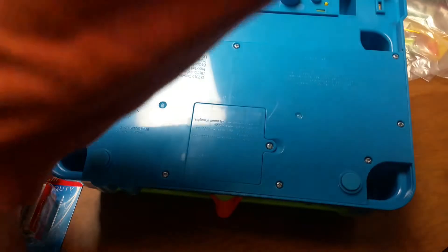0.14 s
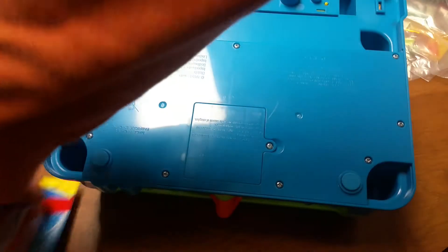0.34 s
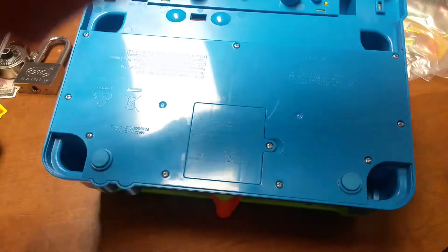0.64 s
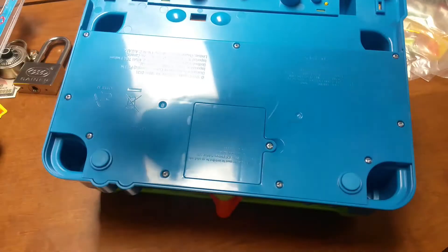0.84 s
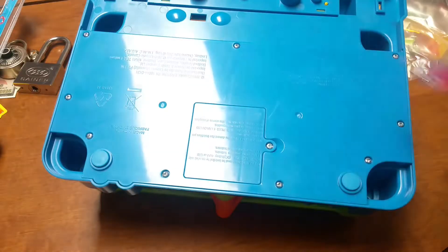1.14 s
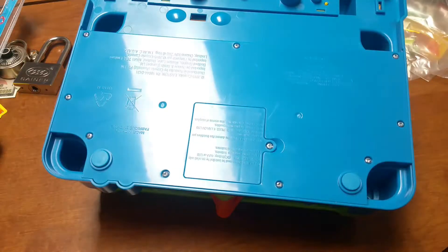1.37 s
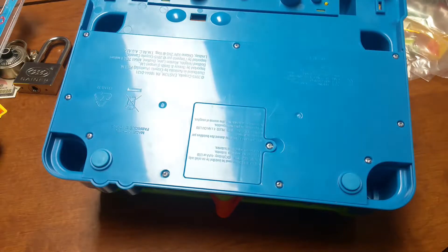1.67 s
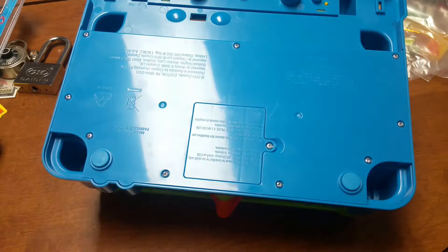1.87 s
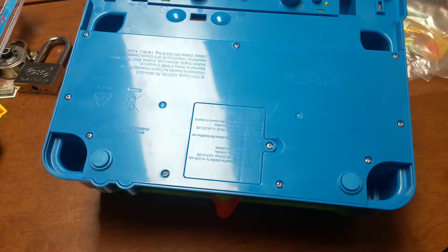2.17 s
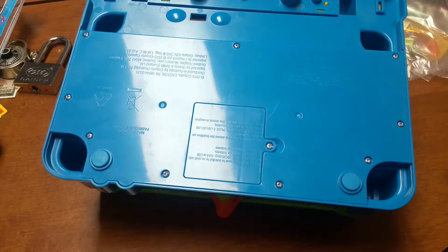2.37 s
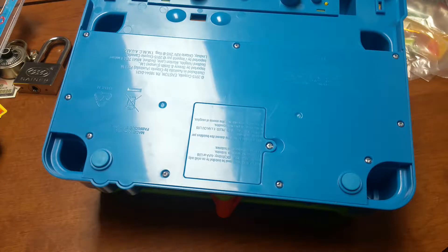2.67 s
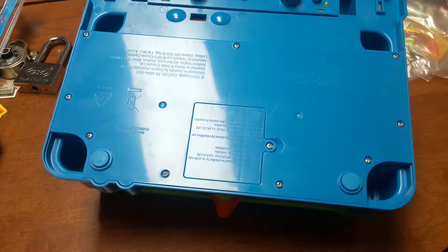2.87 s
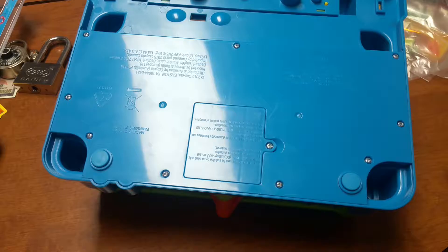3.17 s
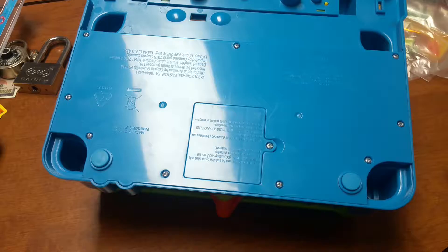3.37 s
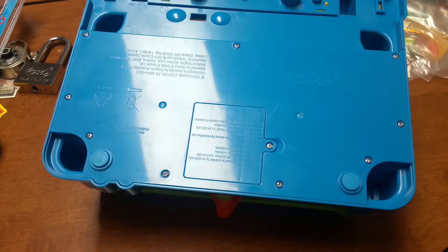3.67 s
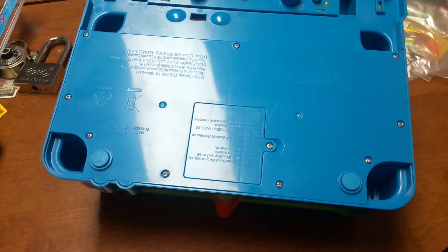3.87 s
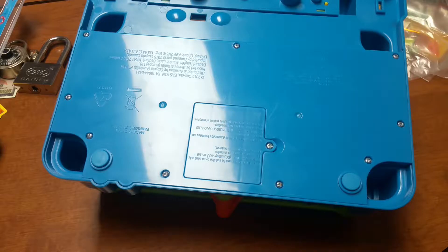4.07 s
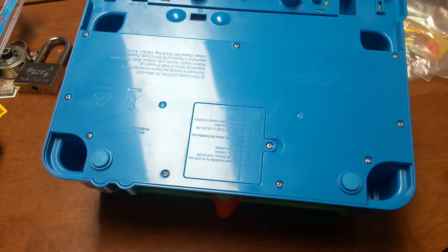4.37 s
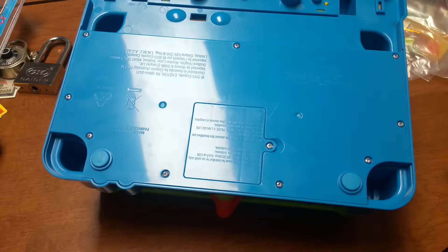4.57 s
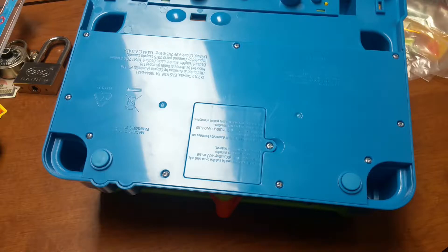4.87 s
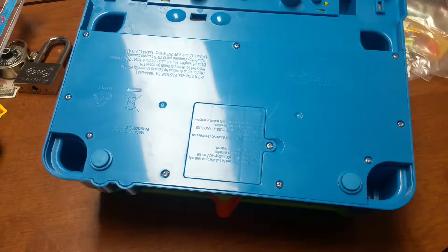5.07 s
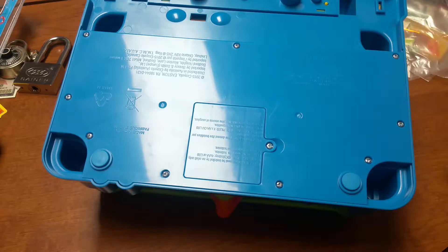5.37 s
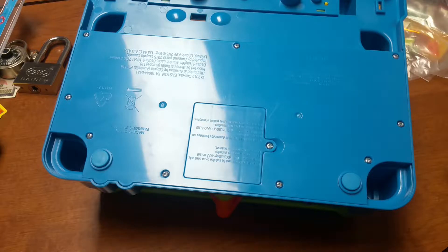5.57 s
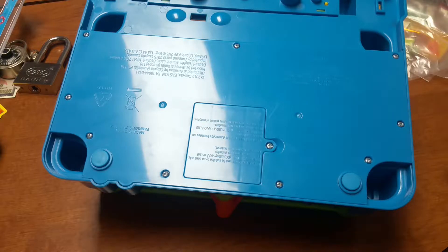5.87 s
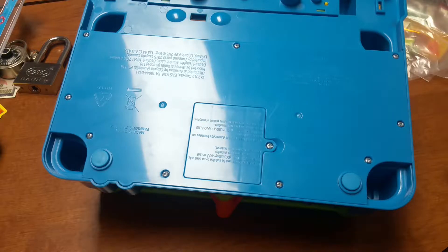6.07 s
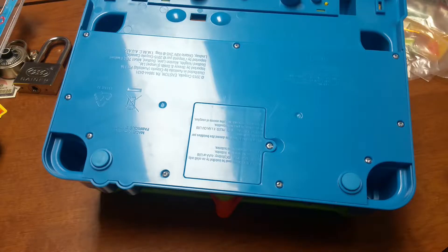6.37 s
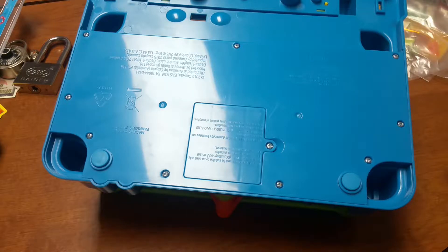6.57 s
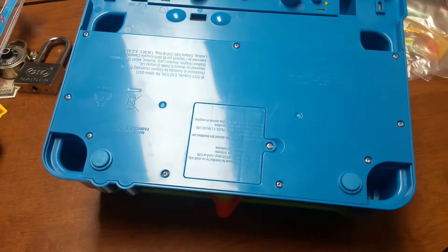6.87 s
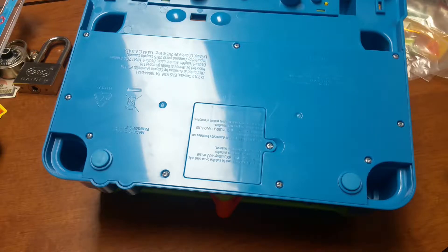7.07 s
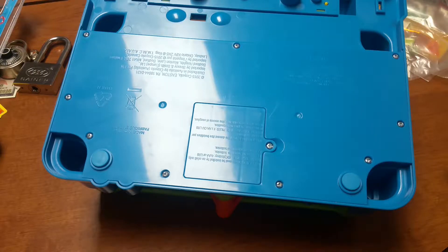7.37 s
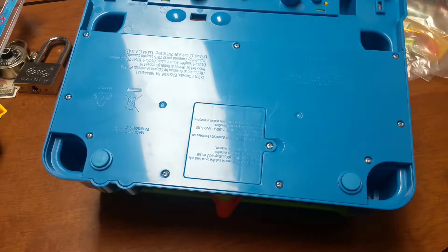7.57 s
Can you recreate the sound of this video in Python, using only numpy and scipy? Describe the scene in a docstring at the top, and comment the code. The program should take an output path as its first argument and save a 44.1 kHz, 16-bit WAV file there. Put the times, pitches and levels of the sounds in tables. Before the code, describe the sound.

In a small quiet room with a faint electrical hum, fingers slide over a stiff plastic blister pack, card rubbing dully and plastic rustling. The pack buckles with one snap, then with uneven bunches of sharp snaps and brief scrapes. Later the plastic also creaks and its edges click in rapid little runs. The sounds are close to the microphone, mostly a little to the right.

```python
"""Hands work at a plastic blister pack of batteries beside a toy, close to two microphone ports.
First, over the air and faint mains hum of a small room, sliding friction makes card and plastic rub
and rustle. At 1 s a facet buckles and its modes ring as a snap; from about 2 s snaps come in clusters,
among gritty fingertip scrapes. From 5.8 s stick-slip creaks and runs of thin edge ticks join them,
until the last tick at 7.7 s. Throughout, the room answers with a short reverberation."""
import sys
import numpy as np
from scipy import signal
from scipy.fft import rfft, irfft
from scipy.io import wavfile
from scipy.ndimage import uniform_filter1d, map_coordinates

SR = 44100
rng = np.random.default_rng(int(sys.argv[2]) if len(sys.argv) > 2 else 0)


def wav_out(sig):
    """Save sig, one row per channel (or a flat mono array), as 16-bit PCM at SR to the path in sys.argv[1]."""
    wavfile.write(sys.argv[1], SR, np.round(np.clip(np.atleast_2d(sig).T, -1, 1) * 32767).astype(np.int16))


N = 341276
TIME, FREQS = np.arange(N) / SR, np.fft.rfftfreq(N, 1 / SR)
IMPACT_SIZE = 2048  # samples in one snap, tick or slip
IMPACT_FREQS = np.fft.rfftfreq(IMPACT_SIZE, 1 / SR)

# Levels are relative within each table unless marked rms.
# spectral density of the room's air: f/Hz, level/dB
AIR_SPECTRUM = [(20, -28), (55, 3), (85, -6.5), (130, 0.5), (220, 6), (320, 2), (450, -4.5), (700, -8.5),
                (1400, -15), (3200, -15.5), (6000, -22), (10000, -25), (15500, -29.5)]
# partials of the hum: f/Hz, rms level/dB
HUM_PARTIALS = [(119, -64), (199.5, -62.5), (297, -64)]
# reverberation time: f/Hz, T60/s
REVERB_TIMES = [(150, 0.78), (700, 0.4452), (2500, 0.4249), (6000, 0.33), (14000, 0.52)]
# colour of the reverberation: f/Hz, level/dB
REVERB_SPECTRUM = [(150, -6), (700, 1.5), (2500, -1.5), (6000, -0.5), (14000, -2.5)]
# position of the hands: t/s, offset (0 straight ahead, 1 to the side)
HAND_PATH = [(.3, 1), (.9, 0), (1.45, 0), (1.8, 1)]
# modes of the hollow body under the fingers: f/Hz, level re the plain rub/dB
BODY_MODES = [(226, 2.5), (282, 3.5), (325, 1), (433, 5.5), (504, 8), (554, -2), (690, 1.5), (809, -2.5)]
# resonances driven by a stroke: centre t/s, duration/s, f/Hz, nominal bandwidth/Hz, level/dB
GROAN_BANDS = [(0.29, 0.3, 343, 45, -61.5), (1.694, 0.0071, 440, 110, -50), (3.522, 0.048, 255, 115, -41),
               (3.81, 0.13, 615, 190, -42.5), (4.246, 0.052, 695, 80, -43.5), (4.343, 0.024, 350, 270, -40),
               (5.238, 0.028, 200, 62, -44.5), (5.543, 0.054, 2380, 54, -40.5),
               (5.586, 0.069, 550, 360, -39.5), (5.946, 0.11, 158.5, 8.5, -45),
               (6.415, 0.38, 265, 154, -53), (6.796, 0.097, 122, 19, -46.5), (6.78, 0.15, 296, 260, -46.5)]
# light contact of the holding hand: t/s, rustle level/dB
HOLD_LEVELS = [(0.16, -55), (0.32, -83), (1.1, -59.5), (1.8, -60.5), (2.8, -70), (3.4, -55.5), (4.4, -53),
               (5.0, -56.5), (5.4, -60), (6.3, -58.5), (7.0, -66), (7.7, -58.5)]
# finger strokes: peak t/s, rise/s, fall/s, rustle level/dB, rub re rustle/dB, fizz re rustle/dB
FINGER_STROKES = [(0.0, .05, 0.11, -40.5, 0.5, -15.5), (0.85, 0.31, 0.22, -68, -16, 1),
                  (1.02, 0.11, 0.071, -56, 6.5, -4), (1.305, 0.077, 0.17, -51, -2, -11),
                  (1.374, 0.029, 0.03, -48.5, -9, 0.5), (2.04, .03, 0.18, -47, -21, -17),
                  (2.38, 0.092, 0.22, -51.5, 1, -5), (2.58, 0.13, 0.19, -48, -18.5, 2),
                  (2.631, 0.03, 0.017, -35, -15, -11), (2.96, 0.26, 0.042, -45, -27, -10),
                  (3.07, 0.49, 0.041, -46.5, 1, -14), (3.26, 0.072, 0.1, -41.5, 5.5, -39),
                  (3.5, 0.022, 0.15, -40.5, 2.5, -20), (3.55, 0.026, 0.034, -38.5, -9, 0),
                  (3.812, 0.33, 0.066, -32.5, -2, -10.5), (4.05, 0.03, 0.15, -48, -1, -5.5),
                  (4.135, 0.072, 0.068, -42, 8.5, -15), (4.221, 0.051, 0.092, -34.5, -2, -14),
                  (4.34, 0.13, 0.24, -44.5, 6, -14), (4.521, 0.011, 0.025, -39, -2.5, 3),
                  (4.70, 0.14, 0.048, -38, 1.5, -37), (4.81, .03, 0.18, -47, -19, -6),
                  (5.03, 0.24, 0.12, -49, 9, -29), (5.096, 0.025, 0.081, -36, -0.5, -3.5),
                  (5.208, 0.062, 0.063, -32.5, -5, -12), (5.538, 0.069, 0.056, -33, -0.5, -3),
                  (5.588, 0.1, 0.13, -36, 5.5, -31), (5.81, 0.067, 0.1, -41, -4.5, -4.5),
                  (5.94, 0.2, 0.11, -44, 0, -27), (6.15, 0.083, 0.016, -45.5, -9, -7.5),
                  (6.385, 0.04, 0.027, -38.5, -16, -6), (6.62, 0.32, 0.56, -46, -0.5, -6),
                  (6.909, 0.033, 0.019, -34.5, -29, -6), (7.109, 0.047, 0.091, -36.5, -13, -7),
                  (7.33, 0.26, 0.94, -44, -12, -8.5), (7.518, 0.025, 0.059, -31, -12, -7),
                  (7.55, 0.038, 0.57, -47.5, -1, -19)]
# spectral densities of rubbed card, rustling plastic and the fizz of dry skin: f/Hz, level/dB
CARD_SPECTRUM = [(40, -37), (120, -8), (210, 2.5), (330, -1.5), (550, -2.5), (820, 2.5), (1100, 0.5),
                 (1600, -7.5), (4000, -30.5), (8000, -26), (16000, -30.5)]
PLASTIC_SPECTRUM = [(400, -26), (900, 1), (1250, 6.5), (2400, 5), (3400, 2.5), (4400, -0.5), (5800, -6.5),
                    (7000, -4.5), (9000, -56), (16000, -76)]
SKIN_SPECTRUM = [(3000, -8.5), (6000, 4), (7200, 0), (8600, -1), (10500, 1), (13000, -8), (15200, -10),
                 (16500, -31)]
# fingertip scrapes: start t/s, release t/s, level/dB, tilt/(dB per octave)
FINGER_SCRAPES = [(1.816, 1.902, -55, 0.5), (1.903, 1.963, -49, 6), (2.542, 2.62, -45, 1),
                  (2.614, 2.656, -43.5, 4), (3.634, 3.703, -45, 0), (3.736, 3.84, -44, -0.5),
                  (4.208, 4.245, -43, 1.5), (5.496, 5.565, -54, -4), (6.94, 6.958, -49, 17),
                  (7.104, 7.126, -43.5, 8)]
# spectral density of a scrape: f/Hz, level/dB
GRIT_SPECTRUM = [(1000, -14), (2400, 4.5), (5800, 0), (8000, -4), (15200, -5.5), (16300, -26)]
# creaks of the plastic: start t/s, end t/s, first slip rate/Hz, last slip rate/Hz, level/dB, f/Hz, Q
CREAK_RUNS = [(5.775, 5.873, 135, 89, -22, 8250, 1), (5.885, 5.952, 170, 240, -17, 4540, 2),
              (6.142, 6.183, 230, 130, -20, 9050, 0.58), (6.392, 6.531, 114, 190, -28, 11500, 1.7),
              (7.229, 7.276, 230, 320, -3.5, 3330, 4.5), (7.296, 7.377, 230, 280, -20.5, 6000, 1)]
# releases of a plastic edge, and around 5.9 s the louder slips of a creak, all with the same modes: t/s,
# level/dB, tilt/(dB per octave)
EDGE_TICKS = [(1.963, -16.5, 12), (3.384, -15, -3.5), (2.96, -11, -3), (4.083, -13, -8), (5.765, -6.5, -1),
              (5.877, -7.5, -5.5), (5.9055, -9, -5), (5.915, -12, -2), (5.925, -11, 3), (5.933, -6.5, -2),
              (6.101, 3, 3.5), (6.1152, -1, 8), (6.126, -4, 7), (6.136, -4, 7), (6.8453, -5, 5),
              (6.8844, 1.5, -0.5), (6.903, 0.5, 3.5), (6.9451, -1.5, 5.5), (7.0341, 1.5, 6.5),
              (7.072, -11, -0.5), (7.152, -11.5, -1), (7.165, -9.5, 6), (7.177, -14, -6.5),
              (7.202, -9.5, 3), (7.215, -13, -3), (7.2373, -10, 8), (7.2414, -17.5, -10), (7.273, -6.5, 10),
              (7.301, -10, 0), (7.324, -10, -4), (7.342, -13, 4), (7.347, -6.5, 1), (7.352, -9, 1),
              (7.3645, -6, 2), (7.37, 4.5, 4), (7.642, 0, 0), (7.585, -9, -7), (7.6936, -16, -10.5)]
# modes shared by these ticks: f/Hz, level/dB, Q
TICK_MODES = [(2950, 0, 1.2), (6530, 0, 3.1), (10400, -6.5, 4.2), (14300, -9.5, 5.3)]
# facets that spring free and ring on: t/s, f/Hz, T60/s, level/dB
FREED_FACETS = [(2.902, 1857, 0.14, -38), (5.4917, 1900, 0.13, -29.5), (6.578, 1845, 0.18, -31.5)]
# modes of the cracking crease, common to all snaps: f/Hz, level/dB, Q
CREASE_MODES = [(4760, -6.5, 4.5), (6280, 2, 5.8), (13100, -16, 3.2), (13400, -21, 23)]
# buckling facets: t/s, facet f/Hz, overtone f/Hz, sheet flex f/Hz, facet Q, overtone Q, level/dB,
# then re that level: flex/dB, overtone/dB, crack/dB
FACET_SNAPS = [(0.974, 1310, 3290, 440, 3.4, 15, 13, -14, -1.5, -18.5),
               (1.976, 1430, 3070, 514, 10.4, 8.5, 17.5, -10, -6, -25.5),
               (2.0345, 1400, 2180, 726, 12, 7.8, 15.5, -13, 2.5, -15.5),
               (2.0495, 1230, 2000, 674, 14, 2.6, 15, -5.5, -5, -32),
               (2.0958, 870.0, 3490, 530.0, 17, 27, 23, -16, -7, -17),
               (2.2259, 1730, 3670, 585, 4.4, 21, 12, -1.5, 2, -16),
               (2.3653, 1410, 3620, 410.0, 18, 12, 8, -12, -0.5, -5.5),
               (2.3888, 1600, 2690, 516, 3.6, 6.5, 14.5, -6, 3, -11.5),
               (2.9023, 1845, 3150, 1270, 13, 8.1, 18.5, -7.5, -8, -15.5),
               (3.6853, 2060.0, 5400, 480.0, 1.5, 6.8, 2, -14, 1.5, -5),
               (3.7716, 1680.0, 5740, 340.0, 1.2, 7.1, 6.5, 8.5, 2, -6),
               (3.8411, 2170, 5300, 530, 2.5, 3.7, 6, 9.5, -1.5, -16),
               (3.9659, 1590, 2800, 590.0, 1.1, 11, 12.5, 1, 0.5, -35),
               (4.0413, 1820, 2430, 660.0, 6.6, 5.7, 5.5, -5, 1.5, -33),
               (4.2167, 850, 3630, 300.0, 1.9, 6.9, 16, -21, -6.5, -25),
               (4.4894, 780, 2060, 480.0, 1.8, 21, 11, -26.0, -9.0, -15),
               (4.5078, 2180, 6500.0, 400.0, 2.6, 2.9, 11, -12, -17, -4.5),
               (4.5144, 1130, 4230.0, 400.0, 13, 3.2, 24.5, -14, -20.5, -28),
               (4.5335, 875, 2470.0, 540.0, 2.8, 7, 13, -18, -17, -35),
               (4.669, 2170, 3640, 820, 2.9, 2.1, 12.5, 5.5, -2.5, -7.5),
               (4.788, 1590, 3460, 870.0, 8.6, 6, 12.5, -6, -4.5, -33),
               (4.7933, 820, 2030, 362, 3.9, 3.9, 13, -6, -2, -13.5),
               (4.8125, 3130, 6060.0, 730.0, 2.9, 16, 10.5, -21, 0, -9),
               (4.8945, 790, 4980.0, 590.0, 11, 7.5, 20.5, -31.0, -24, -29),
               (5.071, 1075, 2880, 716, 8.7, 3.8, 20.5, -3.5, -16.5, -42.5),
               (5.102, 1830, 3450, 770, 3.6, 3.7, 0.5, 10, 13, -14),
               (5.1778, 2630, 5400.0, 850.0, 6.5, 10.1, 9.5, -18, -5, -6),
               (5.182, 780, 4840.0, 410.0, 3.1, 2.5, 23, -4.5, -16.5, -25.0),
               (5.1935, 2570, 5010.0, 960.0, 2.4, 2.7, 11, -2, 0.5, -4),
               (5.1997, 1090.0, 3620, 450.0, 1.8, 18.0, 8.5, -13, 2, 1.5),
               (5.4917, 2140, 4720, 760, 3.9, 10, 17, -15, -1, -9.5),
               (5.527, 690, 3600.0, 403, 3.9, 5.3, 15, -16, -28, -27),
               (5.759, 2050, 3700, 390.0, 2.4, 1.3, 13, -7, -11, -36),
               (5.939, 2670, 5340, 680, 4.6, 6.3, 6, 4, -4.5, -16),
               (5.963, 1870, 3320, 590.0, 7.2, 4.6, 6.5, -6, -4, -28),
               (5.974, 1200, 3060, 905, 7.1, 15, 7.5, 8, -6, -30),
               (5.995, 1770, 2710, 860.0, 8.1, 10, 7.5, -20, 6, -32),
               (6.3365, 1400, 3680, 262, 1.9, 1, 8.5, 4.5, -7, 4),
               (6.5754, 1810, 5280, 750, 4.1, 4.5, 13.5, 2, -2, -4),
               (6.5789, 1870, 4700, 810.0, 6.2, 2.6, 18.5, -15, -10.5, -12),
               (6.7937, 3540, 5630, 295, 7.6, 3.3, 11.5, 5.5, -14, -19),
               (7.0934, 1760, 3550, 300.0, 6, 3.2, 17, -24, -22, -39),
               (7.103, 1810, 3340, 300.0, 6.4, 3.9, 8.5, -29, -1.5, -12),
               (7.2685, 3320, 5550, 340.0, 7.9, 5.6, 8.5, -16, -25, -28),
               (7.424, 1080, 5000, 487, 1.9, 2.1, 10, -5.0, -9, -17),
               (7.5214, 830, 4530.0, 302, 6.7, 2.3, 17, -19, -21, -21),
               (7.5982, 2260, 4540.0, 403, 2.5, 18.0, 3.5, 3, 5.5, -9.5)]


def amp(db):
    """Amplitude ratio of a level in decibels."""
    return 10 ** (np.asarray(db) / 20)


def unit(x):
    """Normalisation to rms 1."""
    return x / np.sqrt(np.mean(x ** 2) + 1e-20)


def curve_at(points, hz):
    """Interpolation of (f/Hz, value) points on a logarithmic frequency axis."""
    f, value = np.transpose(points)
    return np.interp(np.log(hz + 1), np.log(f), value)


def coloured(x, spectrum):
    """Spectral shaping of x, returned at rms 1."""
    return unit(irfft(rfft(x) * amp(curve_at(spectrum, FREQS)), N))


def add(mix, s, sound):
    """Superposition of a stereo sound on the mix at time s."""
    part = mix[:, max(round(s * SR), 0):][:, :sound.shape[1]]
    part += sound[:, :part.shape[1]]


def mode(f, hz, q):
    """Frequency response of a damped oscillator, gain 1 at resonance."""
    return 1j * f * hz / q / (hz ** 2 - f ** 2 + 1j * f * hz / q)


def modal_sum(f, modes):
    """Superposition of (f/Hz, level/dB, Q) modes, neighbours in antiphase."""
    return sum((-1) ** k * amp(db) * mode(f, hz, q) for k, (hz, db, q) in enumerate(modes))


def widened(modes, max_q):
    """Conservation of energy: a mode sharper than max_q becomes broader and lower."""
    return [(hz, db - 10 * np.log10(max(q / max_q, 1)), min(q, max_q)) for hz, db, q in modes]


def panned(balance_db):
    """Constant-power gains for a level difference, left minus right."""
    return unit(amp([[balance_db / 2], [-balance_db / 2]]))


def sideways(s):
    """Lateral offset of the hands at time s."""
    return np.interp(s, *np.transpose(HAND_PATH))


def diffuse(pair, coherent_hz=650):
    """Diffuse field: the two ports are coherent in the bass and independent in the treble."""
    size = pair.shape[1]
    a, b = rfft(pair)
    coherence = np.exp(-(np.fft.rfftfreq(size, 1 / SR) / coherent_hz) ** 2)
    return irfft(np.array([a, coherence * a + np.sqrt(1 - coherence ** 2) * b]), size)


def scatter(share_db, decay_s, delay_s=.0005):
    """Multipath response: the direct path plus early reflections off hands, toy and table."""
    t = np.arange(IMPACT_SIZE) / SR
    bounces = rng.standard_normal((2, IMPACT_SIZE)) * np.exp(-t / decay_s) * (t > delay_s)
    bounces = amp(share_db) * unit(diffuse(bounces)) / np.sqrt(IMPACT_SIZE)
    return (1 + rfft(bounces)) / np.sqrt(1 + amp(share_db) ** 2)


def background(air_db=-55.5, port_noise_db=-9.5):
    """Noise floor: diffuse room air, each port's own noise and a hum with random phase modulation."""
    noise = diffuse(rng.standard_normal((2, N))) + amp(port_noise_db) * rng.standard_normal((2, N))
    knots = np.linspace(0, N / SR, num=40)
    hum = np.zeros(N)
    for hz, db in HUM_PARTIALS:
        phase = np.interp(TIME, knots, rng.standard_normal(len(knots))) + 2 * np.pi * rng.random()
        hum += amp(db) * np.sqrt(2) * np.sin(2 * np.pi * hz * TIME + phase)
    return amp(air_db) * coloured(noise, AIR_SPECTRUM) + hum


def room(x, build_s=0.00006, hold_s=0.0017):
    """Reverberation: dense reflections build up, hold briefly and decay exponentially in each band."""
    size = SR // 2
    hz, t, bands = signal.stft(diffuse(rng.standard_normal((2, size))), SR, nperseg=256)
    fade = np.exp(-np.log(1000) * np.maximum(t - hold_s, 0) / curve_at(REVERB_TIMES, hz)[:, None])
    tail = signal.istft(bands * fade, SR, nperseg=256)[1]
    tail *= 1 - np.exp(-np.arange(tail.shape[1]) / SR / build_s)
    response = rfft(unit(tail) / np.sqrt(tail.shape[1]), N) * amp(curve_at(REVERB_SPECTRUM, FREQS))
    return signal.fftconvolve(x, irfft(response, N)[:, :size], axes=1)[:, :N]


def hollow_body(x, q=42, gain_db=-3.5):
    """Resonant filtering: the hollow body's modes colour whatever rubs on it."""
    response = 1 + sum(amp(db) * mode(FREQS, hz, q) for hz, db in BODY_MODES)
    return amp(gain_db) * irfft(rfft(x) * response, N)


def groans(gain_db=6.0):
    """Forced vibration: friction noise drives one resonance for the length of a stroke."""
    out = np.zeros(N)
    for s, length, hz, width, db in GROAN_BANDS:
        tone = irfft(rfft(rng.standard_normal(N)) * mode(FREQS, hz, hz / (2 * width)) ** 2, N)
        swell = np.exp(-2 * ((TIME - s) / length) ** 2)
        out += amp(db) * tone * swell / np.sqrt(np.average(tone ** 2, weights=swell ** 2))
    return out * panned(0) * amp(gain_db)


def friction(grains_per_s, spread_db, smooth):
    """Shot noise: tiny catches of uneven size fall at random over a smooth hiss."""
    sizes = amp(spread_db * np.minimum(rng.exponential(1, N), 4))
    grains = sizes * rng.choice([-1, 1], N) * (rng.random(N) < grains_per_s / SR)
    return unit(grains) + smooth * rng.standard_normal(N)


def shifting_grip(x, depth_db=3.0):
    """Spectral modulation: as the grip changes, the colour of the friction wanders."""
    bands = signal.stft(x, nperseg=512)[2]
    patches = uniform_filter1d(rng.standard_normal(bands.shape[1:]), size=9, axis=0)  # over frequency
    patches = unit(uniform_filter1d(patches, size=10, axis=1))  # over time
    return unit(signal.istft(bands * amp(depth_db * patches), nperseg=512)[1][:, :N])


def contact_envelopes(depth_db=20, hold_rub_db=-1, hold_fizz_db=-12):
    """Incoherent addition: strokes and holding hand sum in power to gains of rub, rustle and fizz."""
    t = TIME[::64]
    touches = [(np.interp(t, *np.transpose(HOLD_LEVELS)), hold_rub_db, hold_fizz_db)]
    for s, rise, fall, db, rub_db, fizz_db in FINGER_STROKES:
        below_peak_db = depth_db * np.maximum((s - t) / rise, (t - s) / fall)
        touches.append((db - below_peak_db, rub_db, fizz_db))
    power = sum(amp([db + rub_db, db, db + fizz_db]) ** 2 for db, rub_db, fizz_db in touches)
    return [np.interp(TIME, t, np.sqrt(layer)) for layer in power]


def rubbing():
    """Sliding friction: under the fingers card rubs dully, plastic rustles and dry skin fizzes."""
    rub, rustle, fizz = contact_envelopes()
    drag = friction(grains_per_s=700, spread_db=4, smooth=.5)
    dull = hollow_body(rub * coloured(drag, CARD_SPECTRUM))
    grit = friction(grains_per_s=1100, spread_db=3.8, smooth=.3)
    crackle = .65 * friction(grains_per_s=130, spread_db=2.2, smooth=0)
    hiss = .7 * rng.standard_normal((2, N))  # from the whole sheet, so different at each port
    catches = shifting_grip(grit + crackle + hiss)
    bright = rustle * coloured(catches, PLASTIC_SPECTRUM) + fizz * coloured(catches, SKIN_SPECTRUM)
    balance = amp(np.outer([-2.5, 0.56], sideways(TIME)))
    return dull * panned(0) * amp(-0.5) + bright * balance * amp(-2.0)


def scrapes(bite_s=.004, let_go_s=0.01, judder_db=4.5, judder_s=.002, pivot_hz=6000):
    """Amplitude-modulated friction: a fingertip bites, judders over the plastic and lifts."""
    size = SR // 4
    t, f, out = np.arange(size) / SR, np.fft.rfftfreq(size, 1 / SR), np.zeros((2, N))
    knots = np.arange(0, t[-1], judder_s)
    octaves = np.log2(np.maximum(f, GRIT_SPECTRUM[0][0]) / pivot_hz)
    for start, end, db, tilt_db in FINGER_SCRAPES:
        judder = amp(judder_db * np.interp(t, knots, np.clip(rng.standard_normal(len(knots)), -2, 2)))
        grit = rng.laplace(size=size) + .6 * rng.laplace(size=(2, size))  # shared, plus each port's own
        colour = amp(curve_at(GRIT_SPECTRUM, f) + tilt_db * octaves)
        scrape = unit(irfft(rfft(grit * judder) * colour, size))
        contact = np.minimum(t / bite_s, 1) * np.exp(-np.maximum(t - (end - start), 0) / let_go_s)
        add(out, start, amp(db) * panned(balance_db=-5) * contact * scrape)
    return out


def creaks(jitter=.24, spread_db=2.5):
    """Stick-slip oscillation: plastic under a finger gives a nearly periodic run of tiny ticks."""
    out = np.zeros((2, N))
    for start, end, first_rate, last_rate, db, hz, q in CREAK_RUNS:
        s = start
        for lateness, strength in rng.standard_normal(size=(40, 2)):
            slip = irfft(mode(IMPACT_FREQS, hz, q) * scatter(share_db=35, decay_s=0.00009))
            if s < end:
                add(out, s, amp(db + spread_db * strength) * panned(balance_db=-9) * slip)
            s += np.exp(jitter * lateness) / np.interp(s, [start, end], [first_rate, last_rate])
    return out


def ticks(pivot_hz=7000):
    """Impulse excitation: an edge lets go and its high modes ring, brighter for a sharper release."""
    out = np.zeros((2, N))
    octaves = np.log2(np.maximum(IMPACT_FREQS, TICK_MODES[0][0]) / pivot_hz)
    for s, db, tilt_db in EDGE_TICKS:
        edge = modal_sum(IMPACT_FREQS, TICK_MODES) * amp(db + tilt_db * octaves)
        paths = scatter(share_db=0, decay_s=0.0007)
        add(out, s, panned(balance_db=-10) * irfft(edge * paths))
    return out


def after_rings(detune=.017, partner_db=-5):
    """Free vibration: a released facet rings on in two close modes that beat as they decay."""
    t, out = np.arange(SR // 3) / SR, np.zeros((2, N))
    for s, hz, t60, db in FREED_FACETS:
        pair = np.sin(2 * np.pi * hz * t) + amp(partner_db) * np.sin(2 * np.pi * hz * (1 + detune) * t)
        add(out, s, amp(db) * panned(balance_db=-2) * pair * np.exp(-np.log(1000) * t / t60))
    return out


def snaps(max_q, flex_q=3.07, flip_hz=7500, baffle_hz=430, shade_db=-8.5, shade_hz=970, gain_db=3.0):
    """Snap-through buckling: a facet flips, one quick push rings its modes and the crease cracks."""
    f, out = IMPACT_FREQS, np.zeros((2, N))
    push = 1 / (1 - (f / flip_hz) ** 2 + 1j * f / flip_hz)  # the flip takes time, limiting the treble
    radiation = (1j * f / (1j * f + baffle_hz)) ** 2  # a small sheet radiates little bass
    crack = modal_sum(f, CREASE_MODES)
    for s, hz, overtone_hz, flex_hz, q, overtone_q, db, flex_db, overtone_db, crack_db in FACET_SNAPS:
        modes = [(flex_hz, flex_db, flex_q), (hz, 0, q), (overtone_hz, overtone_db, overtone_q)]
        facet = modal_sum(f, widened(modes, max_q)) * push
        snap = amp(db + gain_db) * (facet - amp(crack_db) * crack) * radiation
        shade = amp(shade_db * sideways(s))  # off to the side, the hand shades the left port's treble
        left = snap * (shade + (1 - shade) / (1 + 1j * f / shade_hz))
        paths = scatter(share_db=-6, decay_s=0.002)
        add(out, s, irfft(np.array([left, snap]) * paths))
    return out


def scene(port_lag_samples=16):
    """Direct and reverberant fields add; sound from the side reaches the left port later."""
    pops, clicks, strokes, grit = snaps(max_q=12), ticks() + creaks(), rubbing(), scrapes()
    left, right = pops + clicks + strokes + grit
    lag = port_lag_samples * sideways(TIME)
    direct = np.array([map_coordinates(left, [np.arange(N) - lag], order=5), right])
    blended_pops = snaps(max_q=2.5)  # all round the pack, neighbouring modes blend and feed the room
    radiated = amp(-7.0) * blended_pops + amp(-8.5) * clicks + amp(-0.5) * strokes + amp(-7.5) * grit
    sent = radiated.mean(0)[None]
    turn = np.pi * TIME  # the pattern of reflections changes as the hands move
    echo = room(sent * np.cos(turn)) + room(sent * np.sin(turn))
    return direct + echo * panned(balance_db=0.94) + after_rings() + hollow_body(groans()) + background()


def record(dry):
    """Band limiting: a linear-phase low-pass filter removes the highest treble."""
    low_pass = signal.firwin(255, cutoff=16150, window=("kaiser", 8), fs=SR)
    return signal.oaconvolve(dry, low_pass[None], "same")


dry = scene()
out = record(dry)
wav_out(out)
```